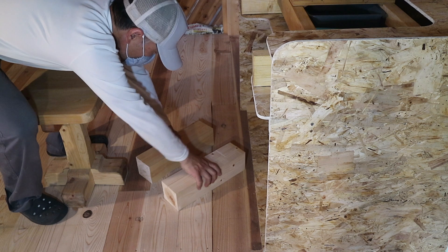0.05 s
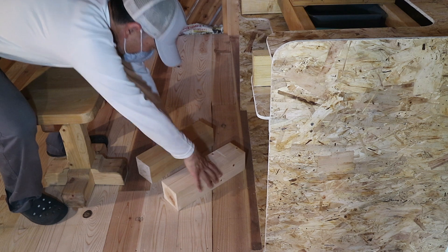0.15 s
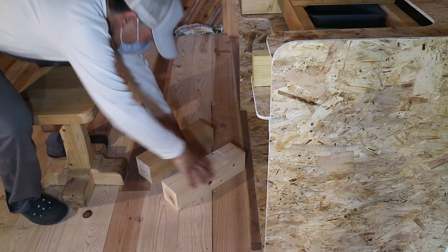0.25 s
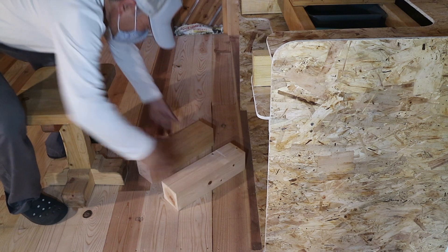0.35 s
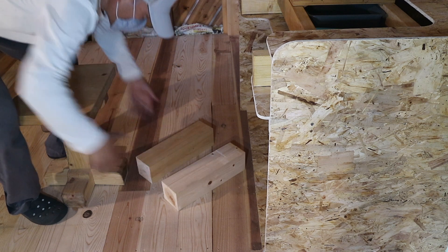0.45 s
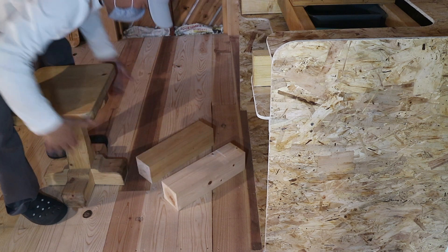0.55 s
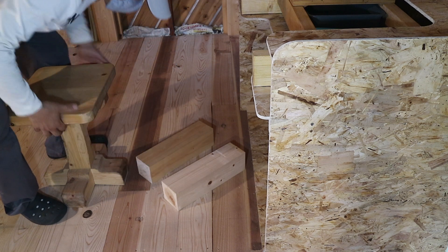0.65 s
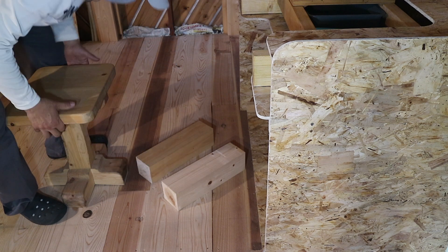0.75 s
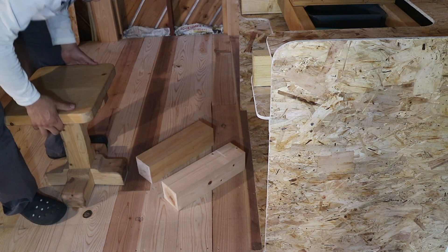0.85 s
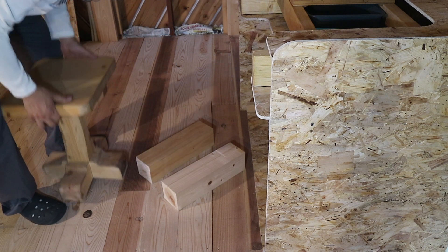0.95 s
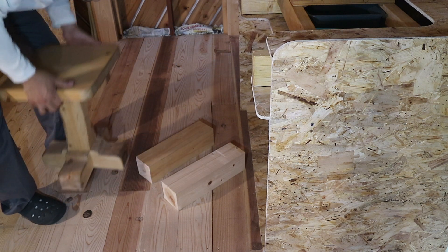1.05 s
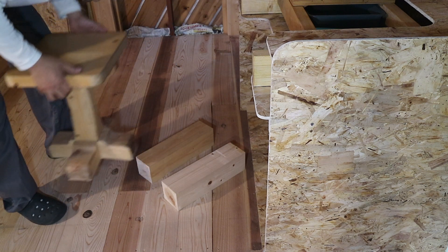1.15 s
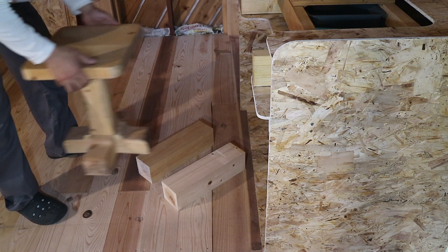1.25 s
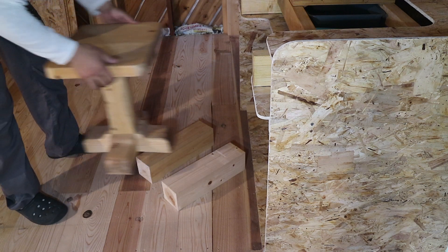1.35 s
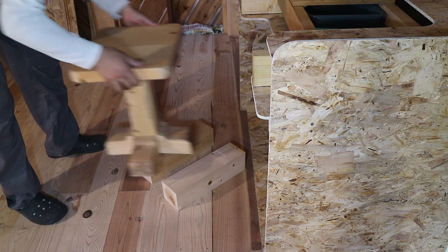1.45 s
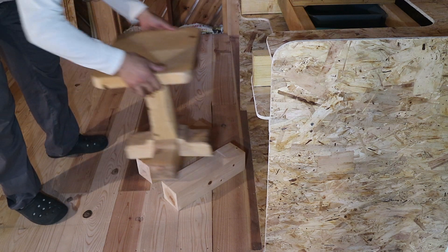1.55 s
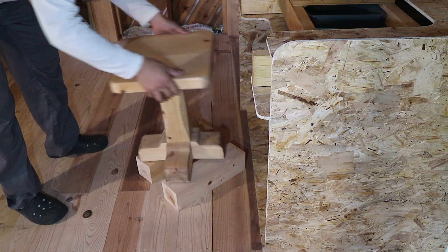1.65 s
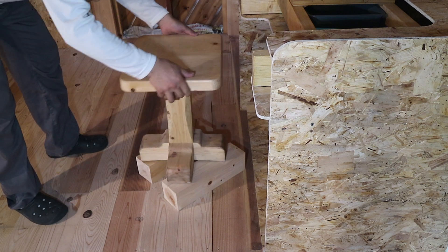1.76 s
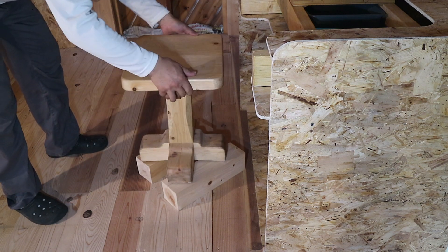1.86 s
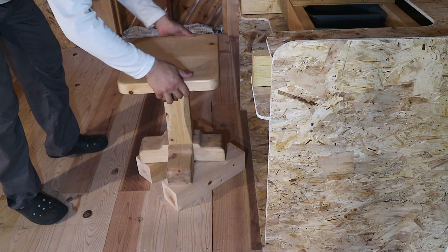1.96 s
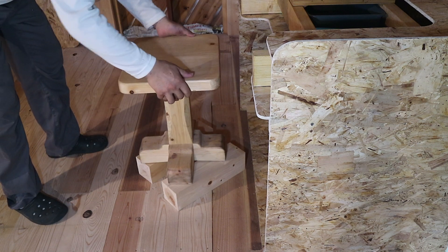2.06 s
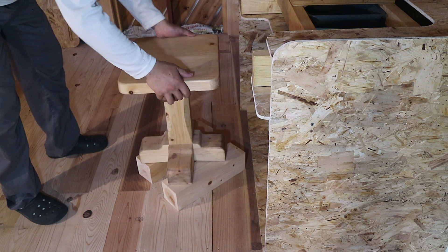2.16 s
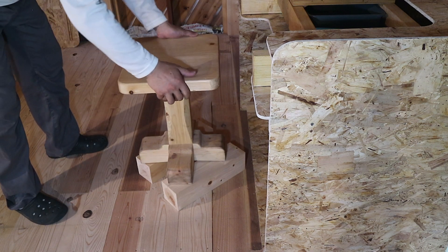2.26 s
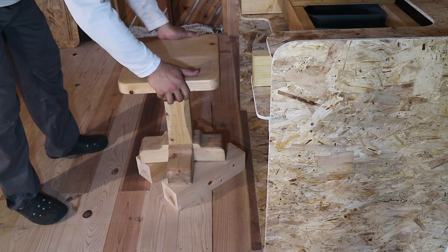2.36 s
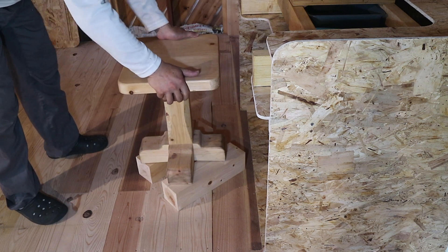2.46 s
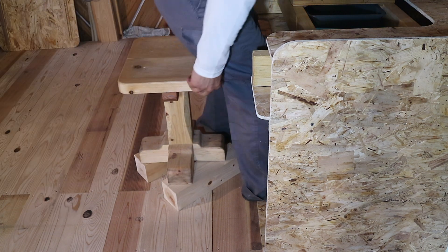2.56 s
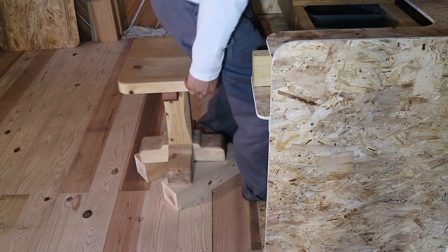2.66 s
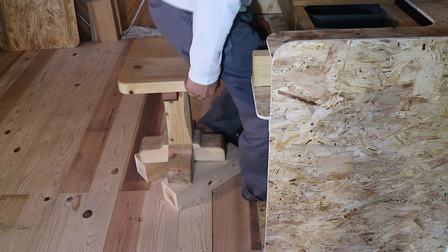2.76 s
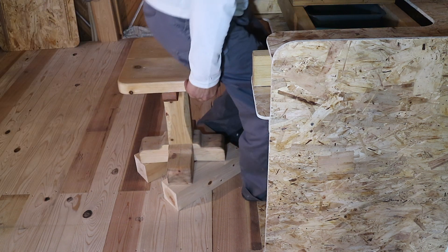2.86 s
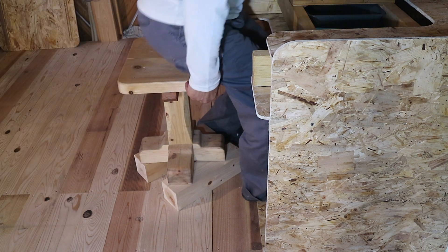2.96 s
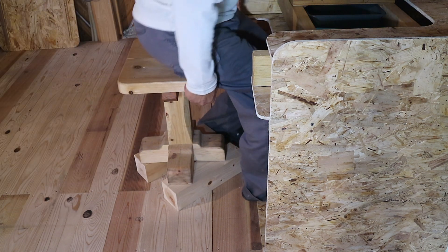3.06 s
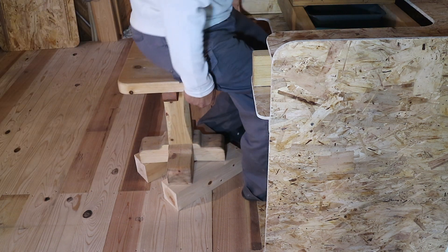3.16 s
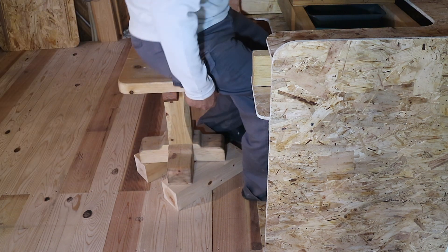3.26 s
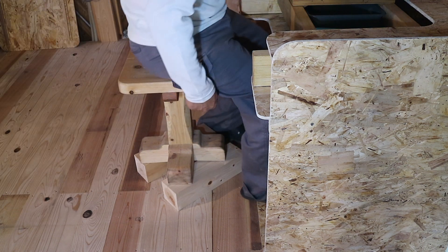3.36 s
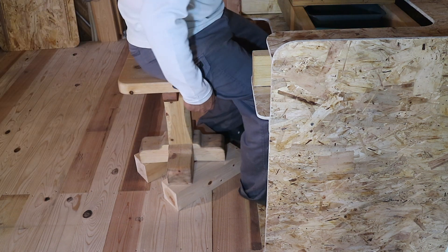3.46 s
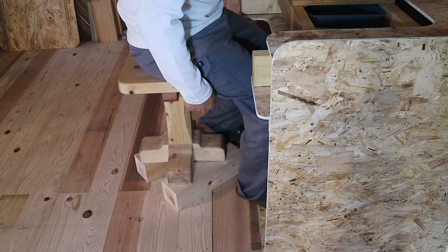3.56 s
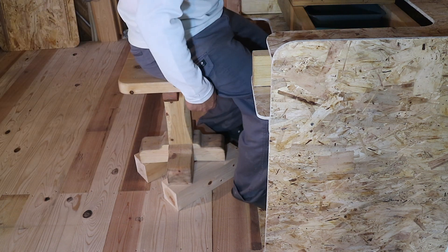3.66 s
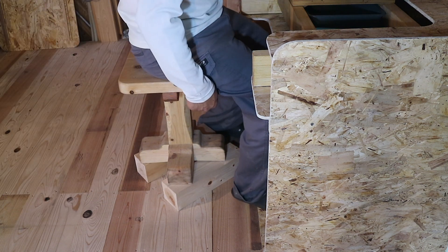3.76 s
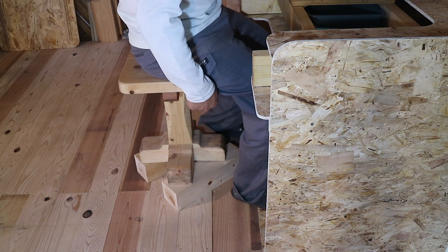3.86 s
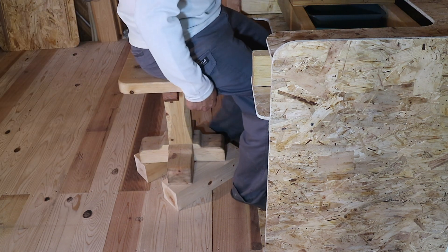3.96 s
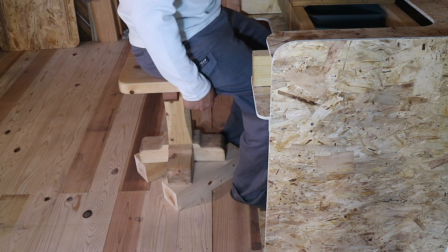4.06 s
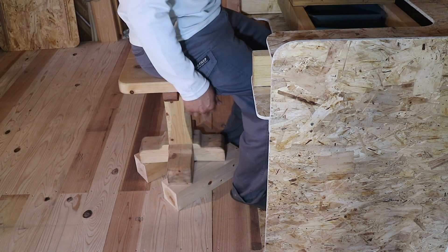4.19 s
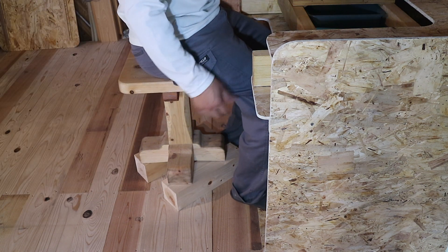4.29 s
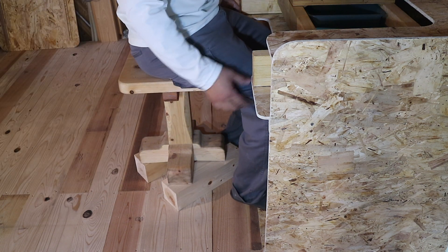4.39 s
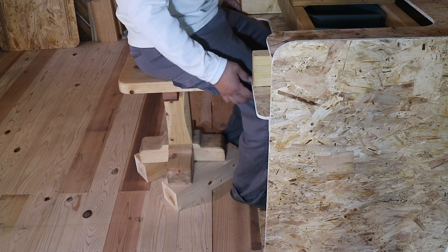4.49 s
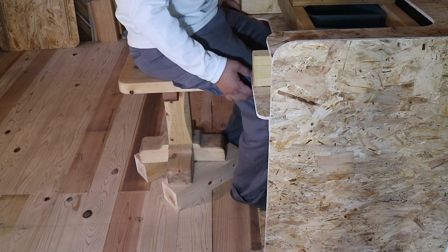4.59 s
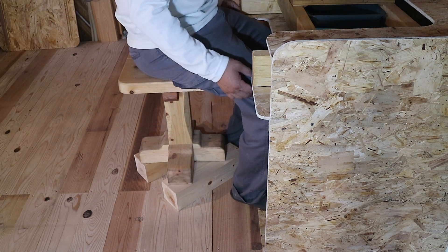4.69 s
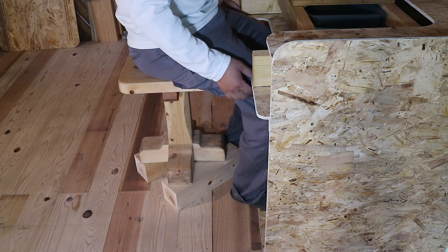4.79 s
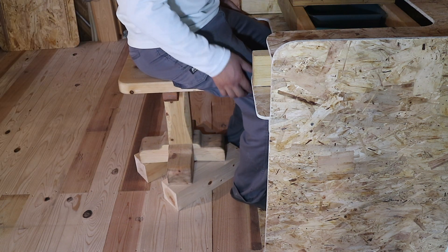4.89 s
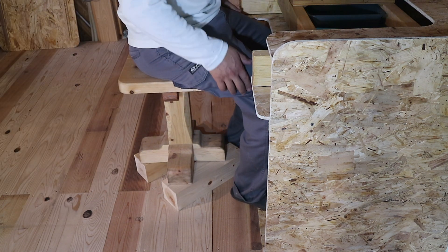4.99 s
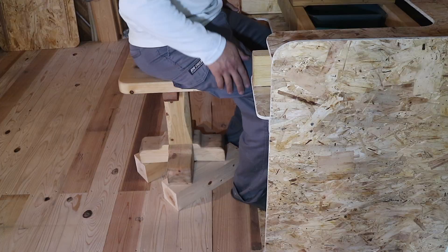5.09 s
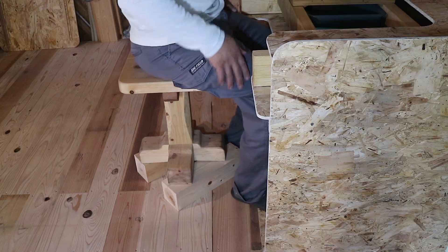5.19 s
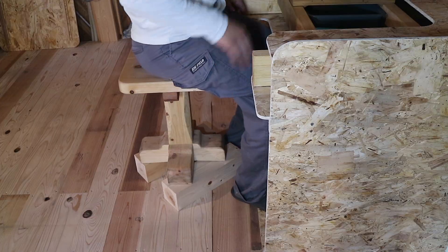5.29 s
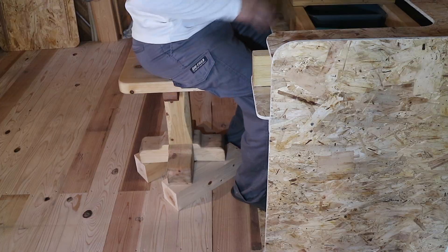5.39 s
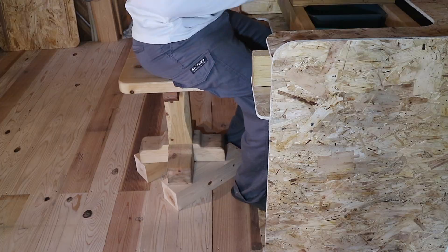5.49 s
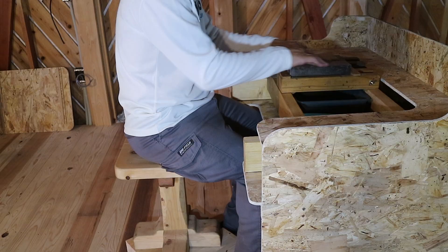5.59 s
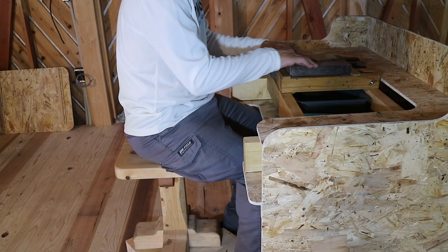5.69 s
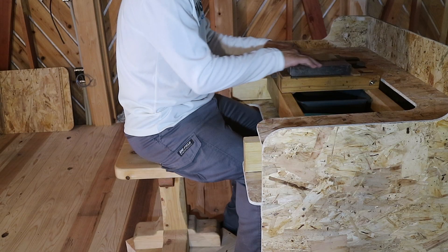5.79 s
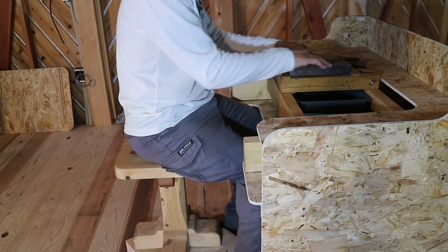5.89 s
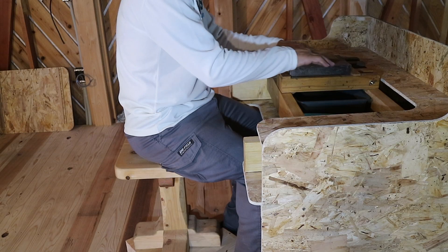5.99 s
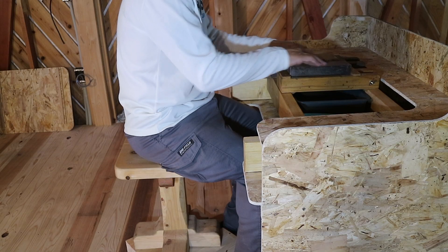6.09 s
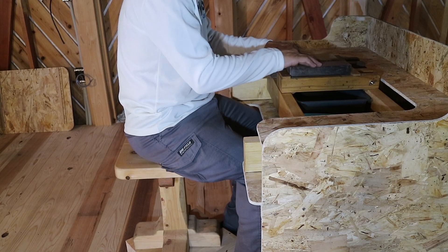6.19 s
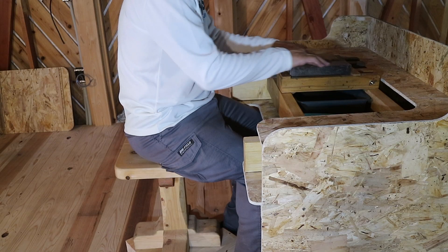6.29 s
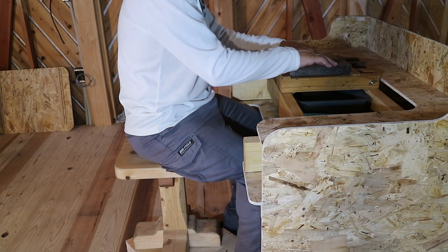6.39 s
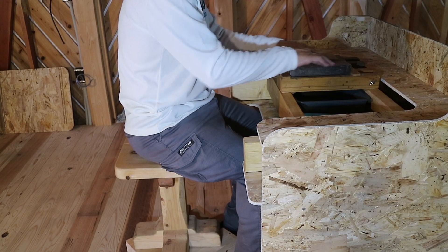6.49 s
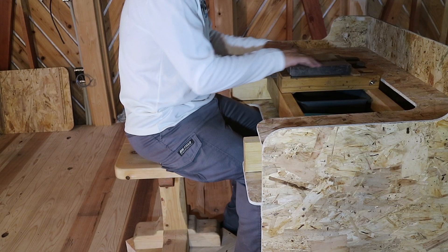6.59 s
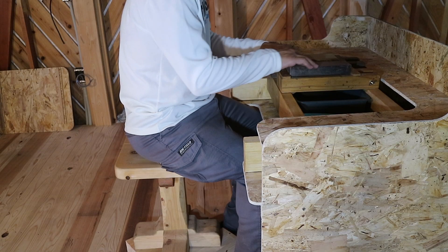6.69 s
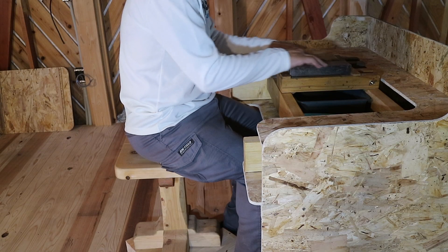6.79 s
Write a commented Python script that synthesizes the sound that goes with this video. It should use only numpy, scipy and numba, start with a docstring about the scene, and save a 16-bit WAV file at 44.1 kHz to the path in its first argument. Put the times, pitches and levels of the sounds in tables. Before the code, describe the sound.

In a small timber workshop, a soft floor thud and rustling clothes lead to a heavy stool landing on wooden blocks with two clattering blows and a duller knock. After a pause, someone sits: a foot thuds, wood scrapes, joints knock sharply and a thin hiss wavers. Clothes rustle, then a hand rubs something to and fro on a bench. Close stereo pickup, brief room ring, quiet steady background.

```python
"""A thud on a plank floor, rustling clothes and a light knock; then a heavy wooden stool is set down on
two solid blocks: two clattering blows and a dull settling knock, as force pulses into ringing wood.
A man sits down: joints catch and knock, stick-slip scrapes groan, a thin hiss wavers (swept low-pass).
Last he rubs something to and fro on the bench: noise shaped by hand speed. Clothes are swelling noise.
A small timber workshop (dying noise bands) rings briefly; quiet steady noise lies beneath."""
import sys
import numpy as np
from scipy import signal
from scipy.fft import rfft, irfft, next_fast_len
from scipy.io import wavfile
from scipy.ndimage import uniform_filter1d
from numba import njit

SR = 44100
rng = np.random.default_rng(int(sys.argv[2]) if len(sys.argv) > 2 else 0)


def master(y):
    """Save y as 16-bit WAV."""
    cut = np.clip(np.atleast_2d(y).T, -1, 1)
    pcm = np.round(cut * 32767)  # scale
    wavfile.write(sys.argv[1], SR, pcm.astype(np.int16))


N = 301644
T = np.arange(N) / SR
TAIL = T[:SR]  # 1 s of decay time

# modes of each block with stool and planks: f/Hz, relative level/dB, t60/s
BLOCK_1_MODES = [(80, -7, .2), (118, -12, .16), (208, -4, .12), (234, 1, .13), (270, -3, .22),
                 (361, -6, .15), (474, -1, .14), (556, -1, .1), (770, -7, .1), (918, -3, .11),
                 (1310, -14, .08)]
BLOCK_2_MODES = [(151, -10, .3), (226, -11, .22), (323, -11, .18), (430, -3, .16), (468, -3, .13),
                 (607, 2, .2), (657, -1, .16), (843, -2, .19), (885, -1, .07), (1005, -5, .1),
                 (1135, -6, .11), (1208, 1, .11), (1836, -17, .1), (2003, -14, .1), (2118, -10, .08),
                 (2326, -14, .1)]
# spectrum of each block's dense, short-lived ringing: f/Hz, relative level/dB
BLOCK_1_DENSE = [(35, -43.5), (75, -9), (130, -6), (250, -5), (500, -2), (1000, -12.5), (1700, -24),
                 (3000, -32), (4500, -36.5), (8000, -52), (13000, -62.5)]
BLOCK_2_DENSE = [(40, -38.5), (80, -14.5), (150, -10.5), (300, -11), (600, -1.5), (1200, -3.5), (1500, -14),
                 (2300, -17.5), (2700, -37), (4500, -40), (8000, -59), (13000, -74.5)]


def blocks():
    """Landing pulses ring block 1, slam pulses ring block 2; both a little left of centre."""
    space_1 = workshop(direct=0.32, early_t60_s=0.048, wet_db=-5, rise_s=0.016)
    first = wood(BLOCK_1_MODES, BLOCK_1_DENSE, dense_db=1.0, space=space_1)
    space_2 = workshop(direct=0.71, early_t60_s=0.059, wet_db=-5, rise_s=.01)
    second = wood(BLOCK_2_MODES, BLOCK_2_DENSE, dense_db=9, space=space_2)
    both = sound_of(taps(landings()), first) + sound_of(taps(chatter(count=5)), second)
    left_right_db = np.array([[1.6], [.6]])
    return both * undb(left_right_db)


# stool lands on block 1, tips over it, later rocks back: t/s, pulse level/dB, blow cut-off f/Hz
LANDINGS = [(1.701, -23.5, 13000), (1.788, -34.5, 360), (2.005, -34, 455)]
# flam of heel, edge, toe, rebound: delay t/s, level re landing/dB, contact cut-off f/Hz
FOOT_CONTACTS = [(0, 1.5, 2004), (.0035, -4, 8494), (.016, 2, 11000), (.048, -14, 1003)]


def landings():
    """Every landing is four contacts; the softer of blow and contact sets each cut-off."""
    contacts = []
    for s, db, blow_hz in LANDINGS:
        for delay_s, part_db, contact_hz in FOOT_CONTACTS:
            contacts.append((s + delay_s, db + part_db, min(blow_hz, contact_hz)))
    return contacts


SLAM_S, SLAM_DB, SLAM_HZ = 1.792, -18, 11500  # first contact: time, pulse level, cut-off
CHATTER_GAP_S, CHATTER_GAP_GROWTH = .00325, 1.43  # first gap, ratio of successive gaps
CHATTER_FALL_DB, CHATTER_DULLING = 0.7, 1.45  # fall per contact, exponent of cut-off fall


def chatter(count):
    """Block 2 chatters on the planks: widening gaps, each contact weaker and duller."""
    k = np.arange(count)
    gaps_s = CHATTER_GAP_S * CHATTER_GAP_GROWTH ** k
    times_s = SLAM_S + np.cumsum(gaps_s) - gaps_s
    return zip(times_s, SLAM_DB - CHATTER_FALL_DB * k, SLAM_HZ / (k + 1) ** CHATTER_DULLING)


# knocks and light touches on the stool: t/s, pulse level/dB, contact cut-off f/Hz
STOOL_KNOCKS = [(.156, -61.5, 11000), (.9, -56, 4300), (1.303, -54.5, 600), (1.406, -61, 900),
                (2.024, -52.5, 9000), (2.754, -40, 11100), (2.776, -40.5, 3100), (2.961, -51, 1310),
                (4.1, -43.5, 654), (4.467, -61.5, 12000), (4.584, -57, 7680), (5.0, -62, 11020)]
# frame modes: f/Hz, relative level/dB, t60/s
FRAME_MODES = [(325, -4, .1), (370, 1, .14), (440, -3, .1), (492, -2, .11), (545, -2, .12), (743, -2, .11),
               (942, -7, .1), (1258, -9, .1), (1342, -7, .11), (1445, -8, .1), (1660, -9, .11),
               (2040, -10, .09), (2482, -8, .28), (3120, -6, .22)]
# spectrum of the frame's dense ringing: f/Hz, relative level/dB
FRAME_DENSE = [(50, -46), (150, -25.5), (350, -5), (800, -9), (1200, -13), (2400, -16.5), (3100, -27),
               (4000, -22.5), (6000, -32), (10000, -41), (13000, -55)]


def stool(groan_db):
    """Knocks, joints and scrapes ring the frame; the scrape groan radiates straight into the space."""
    force, groan = slips(rate_hz=420, scatter_db=4, grit_db=-24, damping=.35)
    frame_space = workshop(direct=0.5, early_t60_s=0.05, wet_db=1.0, rise_s=0.0034)
    frame = wood(FRAME_MODES, FRAME_DENSE, dense_db=6.5, space=frame_space)
    spread = unit(workshop(direct=0.8, early_t60_s=0.027, wet_db=-4.5, rise_s=.012)) / np.sqrt(SR)
    # the stool is too small to radiate deep bass
    spread = colour(spread, [(50, -25.0), (120, 3.5)])
    ringing = sound_of(taps(STOOL_KNOCKS + joints()) + force, frame)
    return undb(1.5) * ringing + undb(groan_db) * sound_of(groan, spread)


# joints that take weight and slip: t/s, catch spacing t/s, knock pulse level/dB, first catch cut-off f/Hz
JOINT_SLIPS = [(3.059, .005, -32, 9200), (3.501, .007, -31, 16000)]
CATCH_DB, SEAT_HZ = -9.5, 1860  # catch level re knock, knock cut-off


def joints():
    """Each joint slips in two lighter catches, the second duller, then knocks as it seats."""
    contacts = []
    for s, gap_s, db, hz in JOINT_SLIPS:
        contacts.append((s, db + CATCH_DB, hz))
        contacts.append((s + gap_s, db + CATCH_DB, hz / 2))
        contacts.append((s + 2 * gap_s, db, SEAT_HZ))
    return contacts


# wood drags over wood: start t/s, end t/s, drive level/dB, starting resonance f/Hz
WOOD_DRAGS = [(1.218, 1.392, -72.5, 410), (2.751, 2.859, -46.5, 520), (3.917, 4, -66, 1300),
              (4.031, 4.153, -56.5, 950), (4.876, 4.966, -67, 1830), (4.998, 5.12, -69, 1370)]
SCRAPE_HZ = 2800  # force cut-off
RISE_OCTAVES_PER_DB, RISE_FROM_DB = 0.05, -72  # louder drags end higher; below -72 dB they sink


def slips(rate_hz, scatter_db, grit_db, damping):
    """Stick-slip: uneven jerks over grit, as a frame force and through a gliding resonance."""
    force, groan = np.zeros((2, N))
    for start, end, db, first_hz in WOOD_DRAGS:
        last_hz = first_hz * 2 ** (RISE_OCTAVES_PER_DB * (db - RISE_FROM_DB))
        size = int((end - start) * SR)
        span = slice(int(start * SR), int(start * SR) + size)
        run = undb(grit_db) * rng.standard_normal(SR)[:size]
        at = (np.cumsum(.5 + rng.random(512)) * SR / rate_hz).astype(int)
        jerks = undb(scatter_db * rng.standard_normal(len(at))) * rng.choice([-1, 1], len(at))
        run[at[at < size]] += jerks[at < size]
        pressure = undb(db) * signal.windows.tukey(size, .35)
        force[span] += soften(unit(run), SCRAPE_HZ) * pressure / np.sqrt(.02 * SR)
        glide_hz = np.geomspace(first_hz, last_hz, size)
        groan[span] += unit(moving_lowpass(run, glide_hz, damping)) * pressure
    return force, groan


# feet on the planks: t/s, pulse level/dB
FOOT_THUDS = [(.002, -42.5), (2.843, -38), (2.97, -46.5)]
# floor boom spectrum: f/Hz, gain/dB
FLOOR_BOOM = [(40, -53), (75, -14), (120, 7.5), (170, -7.5), (280, 1), (900, -17)]
THUD_HZ, SEAT_THUD_DB = 350, -13  # pulse cut-off, thud level re joint knock


def planks():
    """Footfalls and seating joints send soft pulses through the booming floor."""
    space = workshop(direct=0.8, early_t60_s=0.069, wet_db=-4, rise_s=.01)
    boards = unit(colour(space, FLOOR_BOOM)) * np.sqrt(.02)
    thuds = FOOT_THUDS + [(s + 2 * gap_s, db + SEAT_THUD_DB) for s, gap_s, db, _ in JOINT_SLIPS]
    return sound_of(taps((s, db, THUD_HZ) for s, db in thuds), boards)


# hiss swells: start t/s, end t/s, level/dB before waver
HISS_SWELLS = [(2.576, 2.95, -57), (2.95, 3.59, -56.5), (3.618, 4.18, -58.5)]
# hiss spectrum ahead of the moving edge: f/Hz, relative level/dB
HISS_SPECTRUM = [(80, -14), (180, -13), (500, 4), (1200, -4), (2500, -11), (4000, -13), (6400, -34.5),
                 (9000, -16), (13000, -22)]
EDGE_START_HZ, EDGE_TOP_HZ, EDGE_CLIMB_S = 5200, 6390, 0.078  # before waver
EDGE_WAVER = 0.03  # rms, fraction of edge frequency
SWELL_ATTACK_S, SWELL_RELEASE_S = 0.055, 0.11


def wavering_hiss(damping):
    """Thin noise under a sharp resonant edge that climbs, then holds in each swell, always wavering."""
    edge_hz, level = np.full(N, float(EDGE_START_HZ)), np.zeros(N)
    for start, end, db in HISS_SWELLS:
        climb_hz = np.interp(T - start, [0, EDGE_CLIMB_S], [EDGE_START_HZ, EDGE_TOP_HZ])
        edge_hz = np.where(T < start, edge_hz, climb_hz)
        attack = np.sqrt(np.clip((T - start) / SWELL_ATTACK_S, 0, 1))
        release = np.clip((end - T) / SWELL_RELEASE_S, 0, 1)
        level += undb(db) * attack * release
    edge_hz = edge_hz * (1 + EDGE_WAVER * walk(10))
    hiss = stereo_noise(HISS_SPECTRUM, likeness=0.064)
    for stage_damping in (damping, .45, 1.7):
        hiss = np.array([moving_lowpass(x, edge_hz, stage_damping) for x in hiss])
    return unit(hiss) * level * undb(0.48 * walk(25.5))


# hand turns round on the bench: t/s
HAND_TURNS = [5.602, 5.798, 6.049, 6.255, 6.507, 6.755, 6.94]
# stroke grit spectrum: f/Hz, relative level/dB
GRIT_SPECTRUM = [(500, -5), (1200, 2), (2000, -1.5), (2800, 0.5), (5000, 2.5), (8500, -2), (12000, -11.5),
                 (15000, -28)]
# bench murmur spectrum: f/Hz, relative level/dB
MURMUR_SPECTRUM = [(30, -5), (100, 11), (200, -8), (500, 2.5), (1200, 4), (1800, -13), (4000, -30)]
TURN_REST_S = 0.029
STROKE_DB, STROKE_DB_PER_S = -66.5, 1.9  # peak level at first turn, growth as the hand presses harder


def rubbing(bench_db):
    """Grit follows hand speed stroke by stroke; the bench murmur follows its 0.25 s average."""
    travel = 0  # strokes completed
    for start, end in zip(HAND_TURNS, HAND_TURNS[1:]):
        travel = travel + np.clip((T - start - TURN_REST_S / 2) / (end - start - TURN_REST_S), 0, 1)
    press = undb(STROKE_DB + STROKE_DB_PER_S * (T - HAND_TURNS[0]))
    drive = np.sqrt(np.abs(np.sin(np.pi * travel))) * press
    grit = stereo_noise(GRIT_SPECTRUM, likeness=0.07) * undb(.5 * walk(100))
    murmur = stereo_noise(MURMUR_SPECTRUM, likeness=-0.22) * undb(bench_db)
    return grit * drive + murmur * uniform_filter1d(drive, SR // 4)


# sleeves and trousers: middle t/s, half-width to 1/e^2 t/s, relative level/dB
CLOTH_SWISHES = [(0.197, 0.6, -66), (0.773, 0.21, -65), (1.008, 0.089, -62), (1.285, .24, -62.5),
                 (2.317, 0.22, -69), (3.594, 0.9, -64.5), (4.1, 0.12, -57.5), (4.585, 0.44, -72),
                 (5.03, 0.31, -67), (5.3, 0.11, -66.5), (5.56, .1, -68)]
# rustle spectrum: f/Hz, relative level/dB
CLOTH_SPECTRUM = [(100, -4), (320, -18.5), (700, -3.5), (1600, -0.5), (3000, -5.5), (6000, -11.5),
                  (10000, -22.5), (13000, -36.5)]


def cloth():
    """Fabric friction: flickering noise under a Gaussian swell for each movement."""
    motion = sum(undb(db) * np.exp(-2 * ((T - mid_s) / width_s) ** 2) for mid_s, width_s, db in CLOTH_SWISHES)
    return stereo_noise(CLOTH_SPECTRUM, likeness=0.2) * motion * undb(-2 + walk(70))


# background spectrum: f/Hz, relative level/dB
AIR_SPECTRUM = [(25, -17), (45, -14.5), (100, -2), (250, -2), (500, -5.5), (1500, -13), (4000, -20.5),
                (8000, -31), (12000, -37), (14000, -59.5)]
AIR_DB = -60


def air():
    """Steady, wide background noise, left and right partly opposed."""
    return stereo_noise(AIR_SPECTRUM, likeness=-0.46) * undb(AIR_DB)


# workshop reverberation: f/Hz, t60/s
WORKSHOP_T60 = [(80, 0.49), (250, 0.32), (700, 0.25), (2000, 0.44), (5000, .3), (12000, 0.22)]


def workshop(direct, early_t60_s, wet_db, rise_s):
    """Direct sound, quick floor and bench reflections, then the room; bass nearly alike in both ears."""
    def reflections():
        early = dense_ring([(1, early_t60_s)], 0.00017)
        return early + undb(wet_db) * dense_ring(WORKSHOP_T60, rise_s)
    mid, side = reflections(), reflections()
    mid[0] += direct
    side = colour(side, [(80, -20), (150, -10), (300, -5), (1000, -3), (2000, -3), (6000, 2)])
    return mid + np.outer([1, -1], side)


def dense_ring(t60_points, rise_s):
    """Countless overlapping modes: half-octave bands of dying noise, flat in energy."""
    out = 0
    for low in 35 * 2 ** np.arange(0, 8.6, .5):
        high = low * np.sqrt(2)
        fade = undb(-60 * TAIL / read(t60_points, np.sqrt(low * high)))
        noise = rng.standard_normal(SR) * fade * (1 - np.exp(-TAIL / rise_s))
        band = signal.sosfilt(signal.butter(2, [low, high], "band", fs=SR, output="sos"), noise)
        out = out + unit(band) * np.sqrt(2 * (high - low)) / SR
    return out


def wood(modes, points, dense_db, space):
    """Stereo tap response of a wooden body: clear modes plus a broad crack spread by the space."""
    clear = 0
    for k, (hz, db, t60_s) in enumerate(modes):
        # higher modes reach the two ears further out of phase
        skew_rad = np.array([[1], [-1]]) * min(hz / 2200, .6) * rng.choice([-1, 1])
        decay = undb(db - 60 * TAIL / t60_s)
        clear = clear + (-1) ** k * decay * np.sin(2 * np.pi * hz * TAIL + skew_rad)
    clear = soften(clear, 2970)
    crack = unit(colour(space, points))
    return unit(unit(clear) + undb(dense_db) * crack) * np.sqrt(.02)


def taps(rows):
    """One low-passed force pulse per contact (t/s, level/dB, cut-off f/Hz)."""
    force = np.zeros(N + SR)
    for s, db, cutoff_hz in rows:
        start = max(int(s * SR), 0)
        # tiny offset keeps the filter out of denormals
        force[start:start + SR] += undb(db) * soften(signal.unit_impulse(SR) + 1e-18, cutoff_hz)
    return force[:N]


def soften(x, cutoff_hz):
    """A softer contact pushes for longer and so loses its treble."""
    return signal.sosfilt(signal.butter(2, min(cutoff_hz, SR / 2 - SR / 20), fs=SR, output="sos"), x)


def sound_of(force, response):
    """Convolve a force with a stereo response."""
    return signal.fftconvolve(force[None], response, axes=1)[:, :N]


@njit
def moving_lowpass(x, hz, damping):
    """Resonant state-variable low-pass whose edge moves every sample."""
    y, band, low = np.empty(len(x)), 0., 0.
    for i in range(len(x)):
        g = np.tan(np.pi * hz[i] / SR)
        v = (band + g * (x[i] - low)) / (1 + g * (g + damping))
        y[i] = low + g * v
        band, low = 2 * v - band, low + 2 * g * v
    return y


def stereo_noise(points, likeness):
    """Coloured noise, rms 1, with the given left-right correlation."""
    mid, side = rng.standard_normal((2, N))
    c = np.clip(likeness, -1, 1)
    pair = mid * np.sqrt(1 + c) + np.outer([1, -1], side) * np.sqrt(1 - c)
    return unit(colour(pair, points))


def walk(rate_hz):
    """Random wander, rms 1: noise values joined by straight lines."""
    steps = rng.standard_normal(4096)
    return unit(np.interp(T * rate_hz, np.arange(len(steps)), steps))


def colour(x, points):
    """Causal minimum-phase filter with the given (f/Hz, gain/dB) response, via the cepstrum."""
    size = next_fast_len(x.shape[-1], True) * 2
    cepstrum = irfft(np.log(undb(read(points, np.arange(size // 2 + 1) * SR / size))))
    cepstrum[1:size // 2] *= 2
    cepstrum[size // 2 + 1:] = 0
    return irfft(rfft(x, size) * np.exp(rfft(cepstrum)))[..., :x.shape[-1]]


def read(points, hz):
    """Interpolate (f/Hz, value) points on a log-frequency axis."""
    f, value = np.transpose(points)
    return np.interp(np.log(np.maximum(hz, 1)), np.log(f), value)


def unit(x):
    """Scale to rms 1."""
    return x / np.sqrt(np.mean(x ** 2))


def undb(db):
    """Decibels to gain."""
    return 10 ** (np.asarray(db) / 20)


def scene():
    """Sum of all sources, main to background."""
    impacts = blocks() + stool(groan_db=3) + planks()
    friction = wavering_hiss(damping=.06) + rubbing(bench_db=5.5) + cloth()
    return impacts + friction + air()


TOP_HZ = 13200


def record(dry):
    """Steep elliptic low-pass cuts the treble above TOP_HZ."""
    return signal.sosfilt(signal.ellip(8, .2, 70, TOP_HZ, fs=SR, output="sos"), dry)


dry = scene()
out = record(dry)
master(out)
```